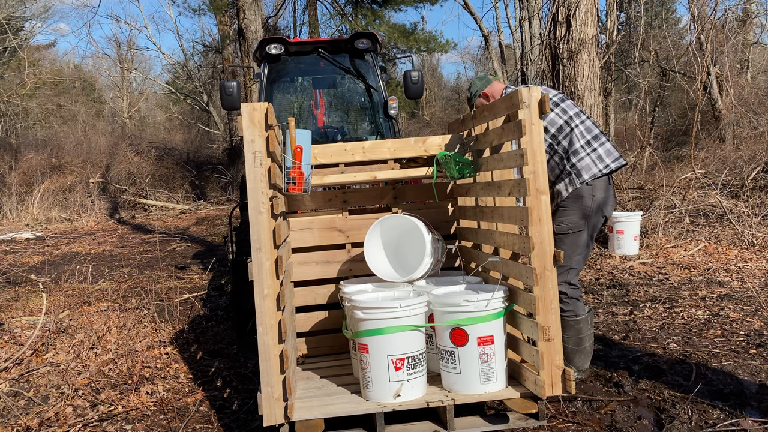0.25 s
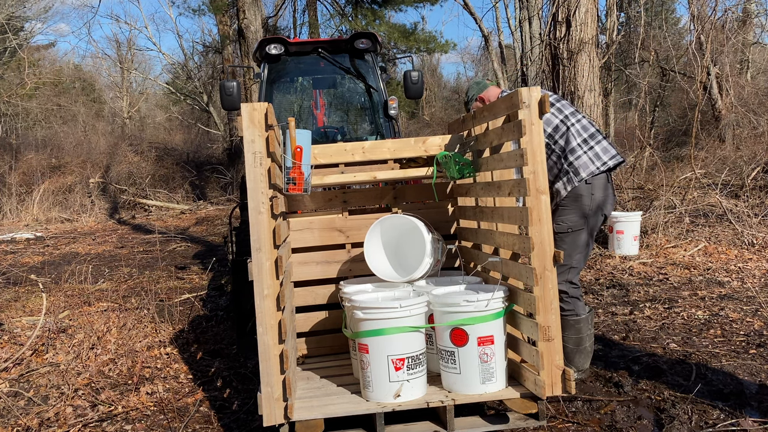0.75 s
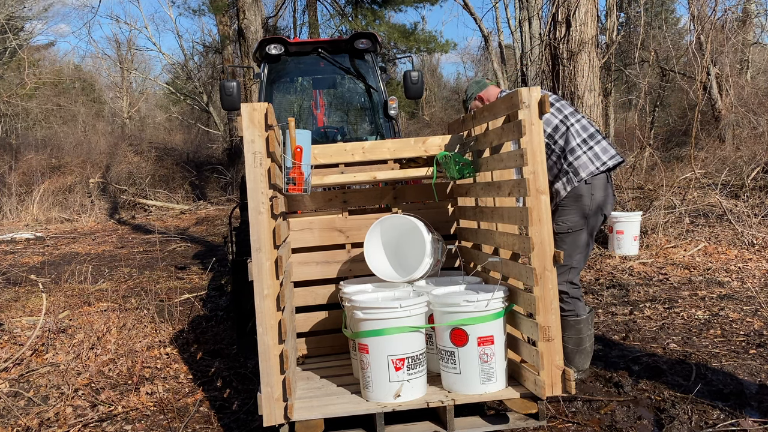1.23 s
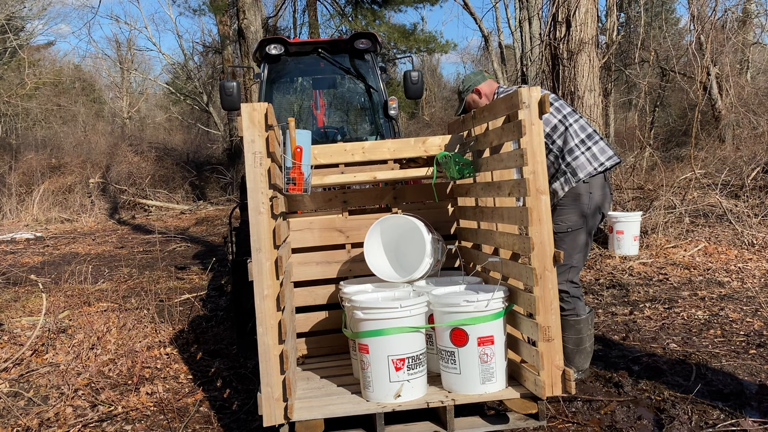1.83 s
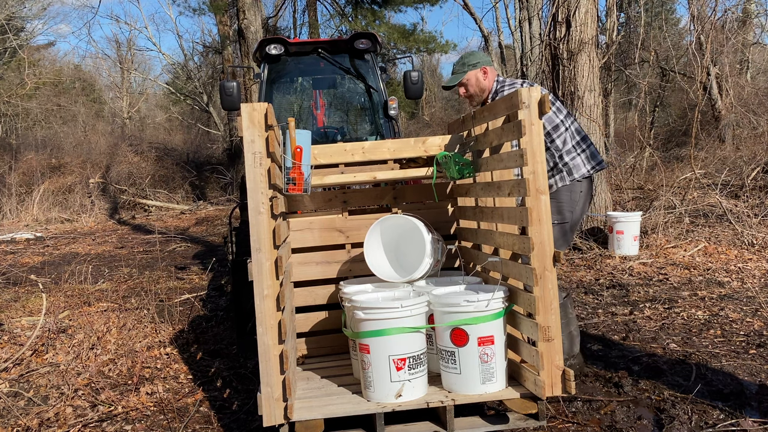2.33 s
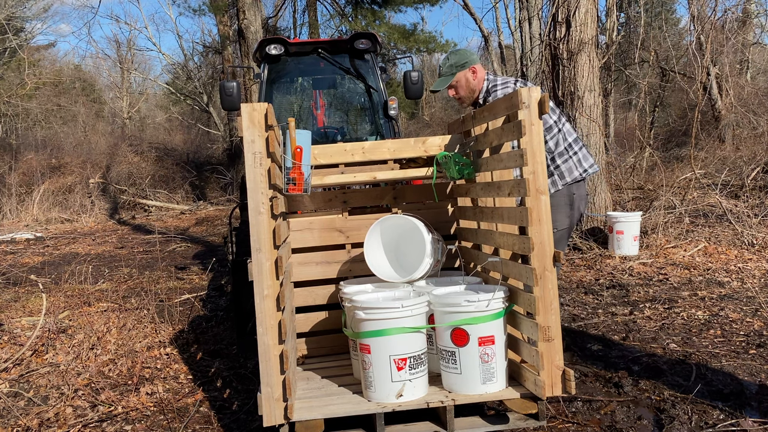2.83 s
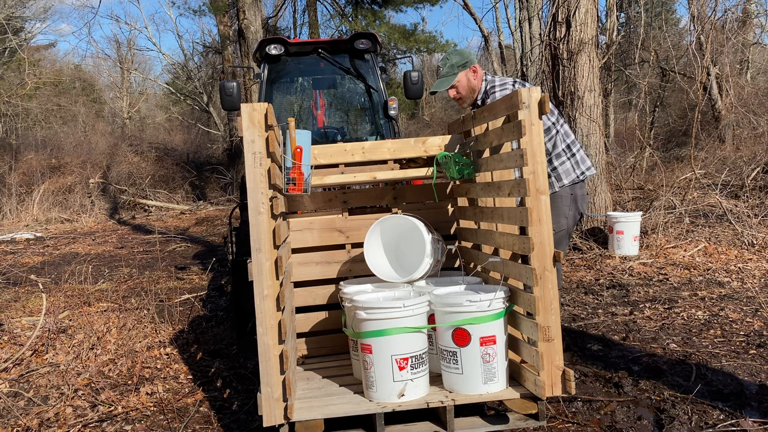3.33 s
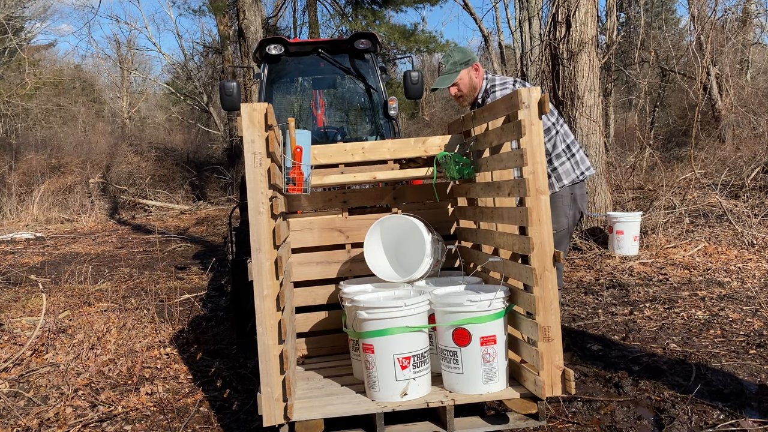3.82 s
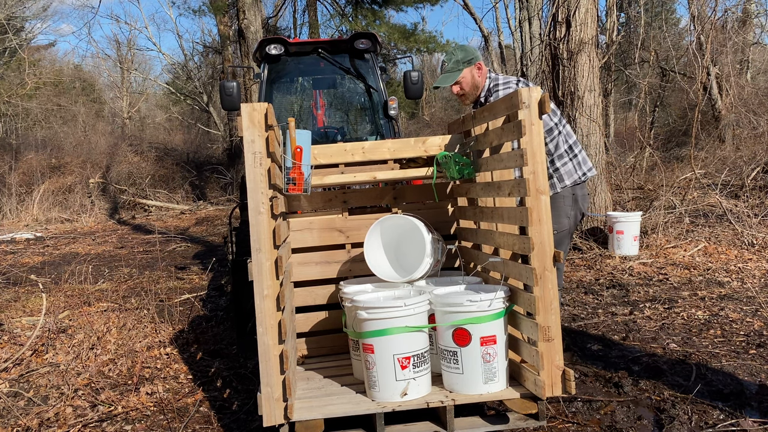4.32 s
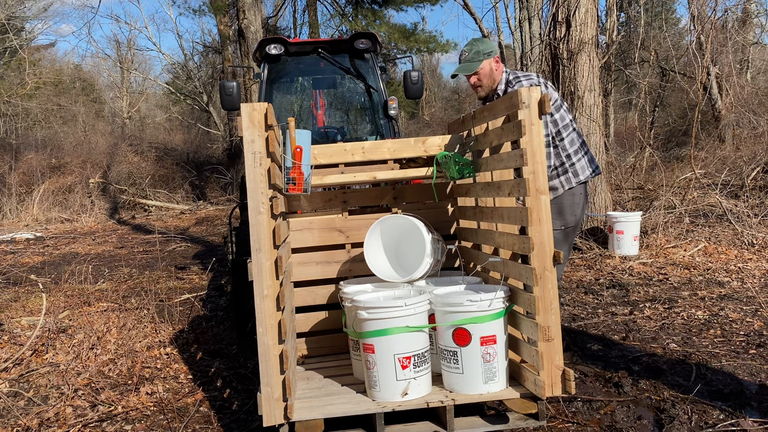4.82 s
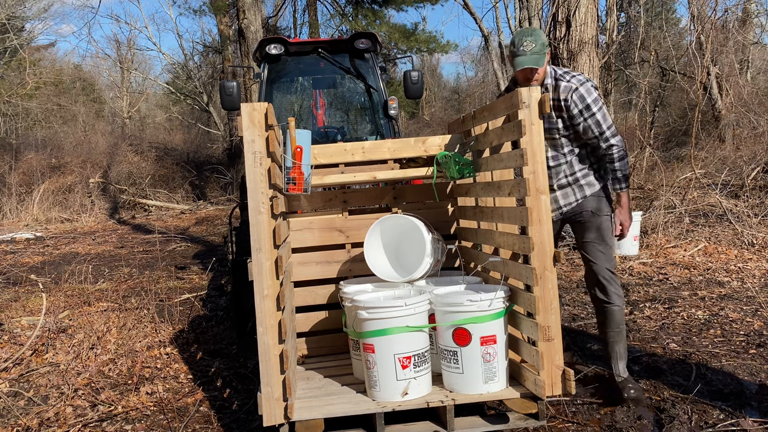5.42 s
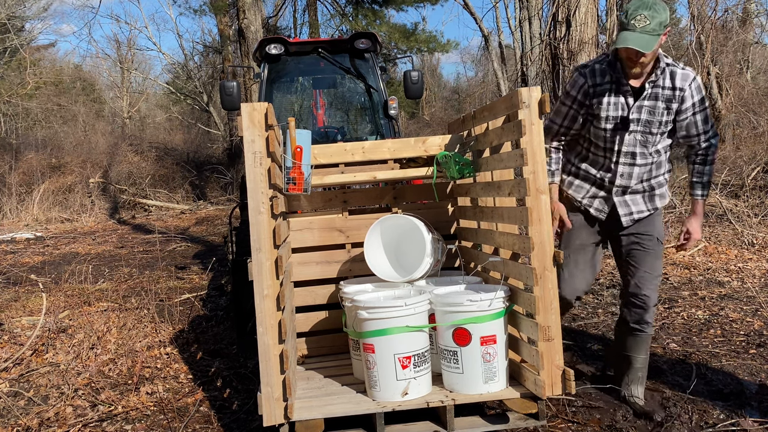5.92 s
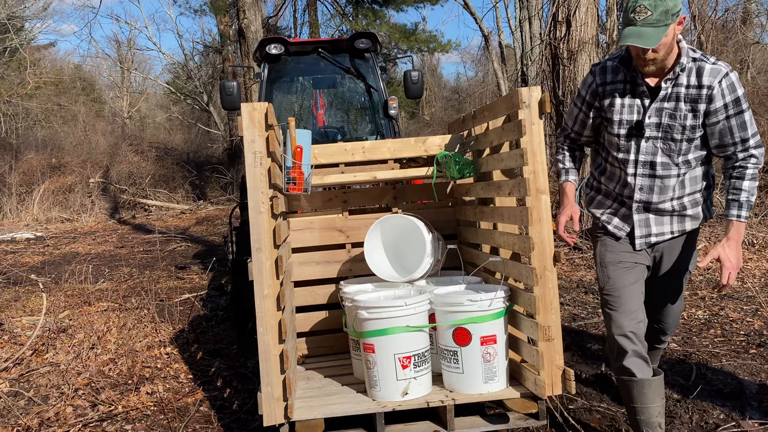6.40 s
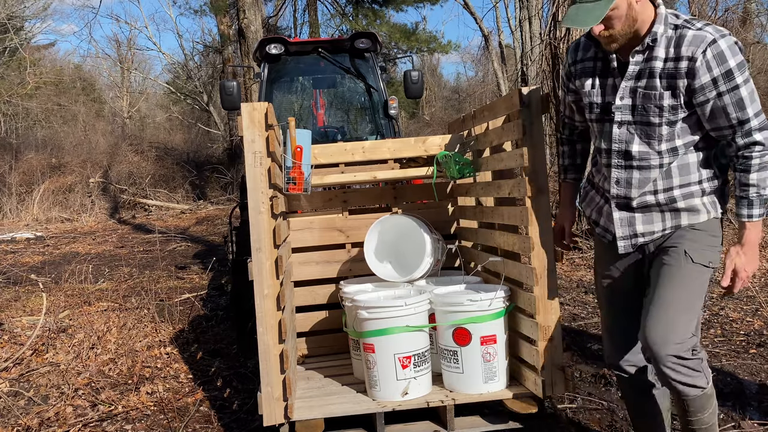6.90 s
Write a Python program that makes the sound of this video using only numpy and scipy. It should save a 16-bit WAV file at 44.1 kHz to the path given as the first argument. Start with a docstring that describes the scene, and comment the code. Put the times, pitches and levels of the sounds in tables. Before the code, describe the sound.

A steel ratchet tightens a strap behind a wooden pallet crate with sharp clicks, rattles and slat knocks, then boots crunch through dry leaves.

```python
"""In a quiet wood, over far rumble and hiss (filtered noise), a steel ratchet tightens a strap behind a wooden crate.
Pawls snap over the teeth (noise cracks with ringing steel modes) and the loaded handle rattles (grainy noise).
Meanwhile the strained slats knock (wood modes), the strap scuffs (noise swells) and its hook touches steel (short
notes); a thin far tone fades early. Then boots crunch through leaf litter (grains of soil, twig and leaf noise).
A mono microphone feeds the right input only; the left stays silent."""
import sys
import numpy as np
from scipy import signal
from scipy.fft import rfft, irfft, next_fast_len
from scipy.io import wavfile
from scipy.ndimage import uniform_filter1d, map_coordinates

SR = 44100
rng = np.random.default_rng(int(sys.argv[2]) if len(sys.argv) > 2 else 0)


def bounce(signal):
    """Save signal as a 16-bit WAV file at the path given by the first command-line argument."""
    frames = np.transpose(np.atleast_2d(signal))
    limited = np.clip(frames, -1, 1)
    pcm = np.round(limited * 32767).astype(np.int16)
    wavfile.write(sys.argv[1], SR, pcm)


N = 315315  # samples
# All levels in the tables are relative: scene() doubles the whole mix.


def amp(db):
    """Turns dB into gain."""
    return 10 ** (np.asarray(db) / 20)


def unit(x):
    """Scales to rms 1."""
    return x / np.sqrt(np.mean(x ** 2, axis=-1, keepdims=True) + 1e-20)


def along(points, hz):
    """Reads a curve of (Hz, value) points on a log frequency axis."""
    f, value = np.transpose(points)
    return np.interp(np.log(hz + 1), np.log(f + 1), value)


def level_curve(points):
    """Draws (s, dB) points as one dB value per sample, -140 dB outside the table."""
    s, db = np.transpose(points)
    return np.interp(np.arange(N) / SR, s, db, left=-140, right=-140)


def wobble(rate):
    """Draws a smooth random curve with rate knots a second."""
    knots = rng.standard_normal(int(N * rate / SR) + 4)
    return map_coordinates(knots, [np.arange(N) * rate / SR])


def filtered(x, response):
    """Multiplies the spectrum of x by a response of frequency."""
    m = next_fast_len(x.shape[-1] + 4096)  # zero padding
    spectrum = rfft(x, m) * response(np.fft.rfftfreq(m, 1 / SR))
    return irfft(spectrum, m)[..., :x.shape[-1]]


def noise(spectrum, shape=N):
    """Colours white noise by (Hz, dB) points, at rms 1."""
    return unit(filtered(rng.standard_normal(shape), lambda hz: amp(along(spectrum, hz))))


def placed(times, sounds):
    """Starts each row of sounds at its time in seconds and mixes them."""
    at = np.round(times * SR).astype(int)[:, None] + np.arange(sounds.shape[1])
    return np.bincount(at.ravel(), sounds.ravel(), N + SR)[:N]


def ring(modes, gains_db, t, scatter_db, detune):
    """Strikes decaying sine modes once per row, each time at new strengths and slightly new pitch."""
    hz, db, t60 = np.transpose(modes)
    luck = rng.standard_normal((len(gains_db), 2, len(hz)))
    level = amp(db + gains_db + scatter_db * luck[:, 0])
    pitch = hz * (1 + detune * luck[:, 1])
    total = 0
    for k in range(len(hz)):
        decay = amp(-60 * t / t60[k])
        total = total + level[:, [k]] * decay * np.sin(2 * np.pi * pitch[:, [k]] * t)
    return total


def grainy(spectrum, rate, spread_db, life, smooth):
    """Mixes short noise bursts (rate per second, life in s) of random size with smooth noise, at rms 1."""
    seeds = (rng.random(N) < rate / SR) * amp(spread_db * rng.exponential(size=N))
    grains = signal.lfilter([1], [1, -np.exp(-1 / (life * SR))], seeds)
    raw = (unit(grains) + smooth) * rng.standard_normal(N)
    return unit(filtered(raw, lambda hz: amp(along(spectrum, hz))))


def bursts(rows, grit_db, sharpness, ripple_db):
    """Shapes gritty noise swells, each around its own broad pitch with chance resonances of its own."""
    s, length, db, pitch = (c[:, None] for c in np.transpose(rows))
    t = np.arange(SR // 6) / SR
    u = t / length
    swell = np.sqrt(u) * np.exp(-1.5 * u ** 2)
    luck = rng.standard_normal((len(s), 3, len(t)))
    grit = amp(grit_db * unit(uniform_filter1d(luck[:, 0], size=90)))  # grains of a millisecond or two

    def colour(hz):
        ripple = amp(ripple_db * unit(uniform_filter1d(luck[:, 2, :len(hz)], size=60)))
        peak = 1 / (1 + (sharpness * (hz / pitch - pitch / (hz + 1))) ** 2) ** 0.61
        return ripple * peak / (1 + (hz / 11000) ** 4)

    return placed(s[:, 0], amp(db) * swell * unit(filtered(grit * luck[:, 1], colour)))


# Spectrum of the far rumble and hiss. Each row: frequency in Hz, relative level in dB.
AIR_SPECTRUM = [(15, -41), (25, -15), (80, 6), (270, 6.5), (887, -5.5), (1650, -8.5), (1890, -14.5),
                (2990, -17.5), (5280, -24), (7920, -28), (10100, -30.5), (14400, -39), (16000, -55.5)]
# Path of a faint far tone. Each row: time in seconds, level in dB.
TONE_LEVEL = [(0, -92), (1, -88), (2.4, -88), (2.9, -100)]
AIR_DB, TONE_HZ = -65, 682


def woodland():
    """Far rumble and hiss, as coloured noise, hold nearly steady; a thin sine tone wavers in them."""
    waver = 0.7 * wobble(5)  # radians
    tone_gain = amp(level_curve(TONE_LEVEL) + 3 * wobble(6))
    tone = tone_gain * np.sin(2 * np.pi * TONE_HZ * np.arange(N) / SR + waver)
    swell_db = 0.6 * wobble(1.5) + wobble(10)
    return amp(AIR_DB + swell_db) * noise(AIR_SPECTRUM) + tone


# A boot presses on the ground. Each row: start in seconds, then soil, twig and leaf level in dB.
BOOT_PRESSES = [(5.51, -58, -54, -59.5), (5.7, -77, -65, -69), (5.92, -60, -69, -73.5),
                (6.068, -41.5, -54.5, -67), (6.25, -60, -60.5, -60), (6.399, -57, -54.5, -63.5),
                (6.65, -71, -67.5, -77.5), (7.041, -61.5, -63.5, -61)]
# Spectrum of soil giving way. Each row: frequency in Hz, relative level in dB.
SOIL_SPECTRUM = [(110, -52), (195, -2.5), (250, -12), (345, -1), (480, -5.5), (650, -12.5), (890, -2.5),
                 (1150, -11), (1700, -29), (2500, -72)]
# Spectrum of crackling leaves. Each row: frequency in Hz, relative level in dB.
LEAF_SPECTRUM = [(1470, -43), (2500, -28), (3380, 1.5), (5030, -3), (5870, -5.5), (9730, -10.5),
                 (16000, -28)]
# Twigs and leaves giving way under a boot. Each row: start and length in seconds, level in dB, pitch in Hz.
CRUNCHES = [(5.536, 0.0068, -32.5, 5470), (5.585, 0.017, -33.5, 3030), (5.604, 0.022, -35.5, 1460),
            (5.61, 0.017, -40.5, 5300), (5.69, 0.026, -46, 1730), (5.785, 0.022, -40, 1420),
            (5.826, 0.0069, -50.5, 2210), (5.957, 0.0063, -42.5, 690), (6.078, 0.029, -38.5, 447),
            (6.092, 0.026, -37, 800), (6.11, 0.043, -45.5, 2256), (6.155, .035, -42.5, 816),
            (6.21, 0.038, -44, 930), (6.328, 0.017, -39, 1230), (6.33, 0.0063, -51, 3980),
            (6.396, 0.016, -28.5, 1550), (6.408, 0.02, -33.5, 3530), (6.456, .01, -37, 3380),
            (6.468, 0.017, -42.5, 2430), (6.64, 0.022, -49.5, 4400), (6.71, 0.031, -55.5, 3130),
            (6.752, 0.018, -50.5, 3280), (6.835, 0.016, -54, 1050), (7.01, 0.025, -56.5, 3800),
            (7.078, 0.05, -47, 2930)]
LOAD_S = 0.055  # rise time of a press
SOIL_SETTLE, TWIG_SETTLE, LEAF_SETTLE = 59.5, 79, 60.5  # fading, dB per second


def boots():
    """Soil gives in lumps, twigs and leaves crackle in grains under louder crunches; presses swell and settle."""
    settle = np.c_[[SOIL_SETTLE, TWIG_SETTLE, LEAF_SETTLE]]
    weight = np.zeros((3, N))
    for start, *db in BOOT_PRESSES:
        since = np.maximum(np.arange(N) / SR - start, 0)
        weight += np.minimum(since / LOAD_S, 1) * amp(np.c_[db] - settle * since)
    twig_spectrum = [(800, -38), (1300, 11.5), (2700, 9), (4000, -24.0)]  # (Hz, relative dB)
    soil = weight[0] * grainy(SOIL_SPECTRUM, rate=130, spread_db=3.0, life=0.0088, smooth=0.21)
    twig = weight[1] * grainy(twig_spectrum, rate=410, spread_db=1, life=0.015, smooth=0.4)
    leaf = weight[2] * grainy(LEAF_SPECTRUM, rate=510, spread_db=1.5, life=0.0043, smooth=0.85)
    crunches = bursts(CRUNCHES, grit_db=5, sharpness=1.05, ripple_db=3)
    return soil + twig + leaf + crunches


# Knocks of slats and pallet. Each row: start in seconds, level, brightness and boom in dB.
KNOCKS = [(0.787, -54.5, 3.5, 0.5), (0.824, -57.5, 13.5, 4.5), (1.129, -53, 5.5, -10),
          (1.432, -52, 13.5, -3), (1.477, -45, 6.5, -14), (1.503, -36.5, -6, -9), (1.73, -55.5, -11, -10),
          (1.791, -48, 3.5, -10), (2.23, -42.5, 1, -12), (2.281, -51, -10, -4), (2.521, -58, 16, -7),
          (2.865, -46.5, 3, -6), (2.941, -48.5, 7.5, -4), (3.204, -56.5, 19, 5), (3.271, -54, 14, 8),
          (3.471, -51, 5.5, -3.5), (3.64, -47, 8, -5), (4.1, -51.5, -12, 4.5), (4.466, -63, 15, -11),
          (4.478, -58.5, 25, -19.5), (4.491, -56.5, 22.5, -13), (4.69, -48, 2, -11.5),
          (4.966, -48.5, 17.5, -28), (5.064, -52.5, 11, 0), (5.138, -47, 15.5, 3.5)]
# Modes of the wood. Each row: frequency in Hz, relative level in dB, 60 dB decay time in seconds.
WOOD_MODES = [(170, -14.5, 0.16), (288.4, -2.5, 0.27), (329.4, -8.5, 0.26), (413, -7, 0.1),
              (483, -11.5, 0.056), (617, -5.5, 0.054), (977, -15, 0.041), (1200, 0.5, 0.0095),
              (1600, -7, 0.036), (1800, -23, 0.008)]
# Strap and handle rubbing on slats. Each row: start and length in seconds, level in dB, pitch in Hz.
SCUFFS = [(.66, 0.053, -49, 5030), (.77, 0.082, -51, 326), (.897, 0.032, -56.5, 1180),
          (1.43, 0.058, -43, 4450), (1.505, 0.05, -45.5, 205), (1.508, 0.012, -39.5, 700),
          (2.23, 0.018, -47, 1480), (2.235, 0.032, -44.5, 343), (2.555, 0.041, -49, 480),
          (2.278, 0.013, -44.5, 2000), (2.295, 0.045, -46.5, 1170), (2.325, 0.025, -43, 1550),
          (2.55, 0.051, -41.5, 1700), (2.575, 0.031, -44, 3400), (2.75, 0.049, -47.5, 5000),
          (2.828, 0.02, -50, 1400), (2.858, 0.029, -43, 1000), (2.92, 0.035, -41, 4860),
          (3.6, 0.078, -62.5, 1560), (4.33, 0.032, -52, 4070), (4.485, 0.029, -51, 860),
          (4.66, .06, -49, 2150), (4.97, 0.03, -41.5, 1180)]


def crate():
    """Strap tension knocks the slats; some knocks reach the higher modes, some set the crate's hollow booming."""
    s, db, bright_db, boom_db = np.transpose(KNOCKS)
    t = np.arange(SR // 5) / SR
    hz = np.transpose(WOOD_MODES)[0]
    high = hz > 800
    hollow = np.abs(hz - 295) < 45
    gains_db = db[:, None] + high * bright_db[:, None] + hollow * boom_db[:, None]
    onset = 1 - np.exp(-t / 0.0008)
    knocks = onset * ring(WOOD_MODES, gains_db, t, scatter_db=3, detune=0.015)
    return placed(s, knocks) + bursts(SCUFFS, grit_db=3.5, sharpness=0.94, ripple_db=2.0)


# The strap hook touches steel. Each row: start in seconds, level in dB, pitch in Hz.
HOOK_TOUCHES = [(0.625, -50.5, 1550), (1.289, -41.5, 3630), (2.884, -34, 4020), (4.034, -43.5, 4130)]


def hook():
    """Each touch is one short decaying sine; its phase wanders, so it sounds scratchy."""
    s, db, hz = (c[:, None] for c in np.transpose(HOOK_TOUCHES))
    t = np.arange(SR // 10) / SR
    wander = 0.12 * np.cumsum(rng.standard_normal((len(s), len(t))), axis=1)
    envelope = amp(db - 60 * t / 0.029) * (1 - np.exp(-t / 0.00094))
    return placed(s[:, 0], envelope * np.sin(2 * np.pi * hz * t + wander))


# A fine rustle behind everything. Each row: time in seconds, level in dB.
RUSTLE_LEVEL = [(0.0, -79), (0.67, -75), (0.82, -72), (2.05, -76), (2.19, -64), (3.27, -78.5), (3.86, -77),
                (4.22, -88), (4.68, -74.5), (5.44, -69.5), (5.63, -68.5), (6.05, -70.5), (6.33, -68),
                (6.59, -70), (6.83, -79.5), (7.15, -71.5)]
# Spectrum of that rustle. Each row: frequency in Hz, relative level in dB.
RUSTLE_SPECTRUM = [(700, -29.5), (1500, -6.5), (3000, -4), (6000, -3.5), (10000, -11.5), (16000, -30.5)]
# Spells in which the loaded handle chatters. Each row: start and length in seconds, level in dB.
CHATTER = [(0.642, 0.082, -45), (0.767, 0.077, -47), (0.953, 0.16, -52), (1.388, 0.064, -51),
           (1.996, 0.082, -44.5), (2.084, 0.12, -42), (2.223, 0.097, -50), (2.531, 0.077, -40),
           (2.736, .07, -47.5), (2.85, .1, -42), (3.576, 0.12, -40.5), (3.945, 0.055, -46.5),
           (4.316, .04, -60), (4.419, .04, -63), (4.63, 0.071, -42)]
PLAY_UNDER_DB = 18.5  # loose play of spring and strap, under a spell's level


def loose_play():
    """A fine grainy rattle swells through each spell of chatter, over a faint rustle that comes and goes."""
    t = np.arange(N) / SR
    spells = np.zeros(N)
    for start, length, db in CHATTER:
        from_middle = t - start - length / 2
        spells += amp(db - PLAY_UNDER_DB) * np.exp(-(from_middle / (0.4 * length)) ** 2)
    rustle = grainy(RUSTLE_SPECTRUM, rate=340, spread_db=2.5, life=0.0035, smooth=1.7)
    rattle = grainy(CRACK_SPECTRUM, rate=370, spread_db=4.0, life=0.0033, smooth=0.34)
    return amp(level_curve(RUSTLE_LEVEL)) * rustle + spells * rattle


TOUCH_SPREAD_DB, TOUCH_LOW_DB, TOUCH_LOW_SPREAD_DB = 3.5, -1.5, 6


def chatter_touches(count):
    """Spreads small contacts by chance through each chatter spell: times, level dB, low part dB."""
    start, length, db = (c[:, None] for c in np.transpose(CHATTER))
    luck = rng.standard_normal((len(start), 3, count))
    s = start + length * (np.arange(count) + 0.5 + np.tanh(luck[:, 0]) / 2) / count
    level_db = db + TOUCH_SPREAD_DB * luck[:, 1]
    low_db = TOUCH_LOW_DB + TOUCH_LOW_SPREAD_DB * luck[:, 2]
    return np.array([s, level_db, low_db]).reshape(3, -1)


# The handle hits its stop. Each row: start in seconds, level in dB.
SLAPS = [(0.728, -67), (0.795, -62), (1.479, -51), (2.13, -74.5), (2.936, -75)]
# Long-ringing handle modes. Each row: frequency in Hz, relative level in dB, 60 dB decay time in seconds.
HANDLE_MODES = [(6270, -7, 0.083), (9800, -15, 0.26)]


def handle_slaps():
    """The handle's long steel modes ring each time it hits its stop."""
    s, db = np.transpose(SLAPS)
    t = np.arange(SR // 4) / SR
    return placed(s, ring(HANDLE_MODES, db[:, None], t, scatter_db=7.0, detune=0.001))


# Clear pawl snaps and handle contacts. Each row: contact time in seconds, peak level in dB, low part in dB.
CLICKS = [(0.3373, -15.5, -8), (0.4129, -14, 1), (0.5964, -50, -8), (.6529, -41, 0), (0.6697, -39, -7),
          (0.6873, -28, -26), (0.7056, -28.5, -12), (.724, -30, -19), (0.7306, -14.5, -21),
          (0.737, -24.5, -7), (0.7452, -30, -4), (.776, -27, -7), (0.7868, -25.5, -20),
          (0.7939, -16, -12.5), (0.8406, -42.5, -24), (0.9098, -42, -17), (.9292, -47.5, -12),
          (0.9574, -33, -6.5), (1.072, -11.5, -11.5), (1.1213, -36, 1.5), (1.1316, -14.5, -12.5),
          (1.2722, -36.5, -3.5), (1.336, -34, -5), (1.346, -34.5, -13), (1.3613, -38, 0),
          (1.4243, -32, -16), (1.4304, -14, -22), (1.441, -28.5, 4), (1.471, -23.5, -14),
          (1.4787, -15.5, -19.5), (1.5038, -32.5, 9), (1.6431, -31, -17.5), (1.6683, -35, -4),
          (1.7332, -15, -5.5), (1.753, -38.5, 0), (1.7948, -18, -6.5), (2.041, -36.5, 4.5),
          (2.0488, -27, -10), (2.067, -37, -5.5), (2.096, -32, -22), (2.1025, -25.5, -23),
          (2.1148, -22.5, -16), (2.1208, -25, -10.5), (2.1284, -28, 3), (2.1307, -19, -18),
          (2.165, -32, -10), (2.1903, -20, 3.5), (2.1961, -16.5, -15), (2.212, -38, 21), (2.2342, -30, 8),
          (2.3279, -27.5, -4), (2.417, -40.5, 18.5), (2.4786, -16.5, -8.5), (2.5253, -16.5, -3),
          (2.5852, -49.5, 0), (2.7678, -36.5, -4), (2.792, -48, -10), (2.799, -29, -15.5),
          (2.8301, -42.5, 1.5), (2.8506, -33, -18.5), (2.8606, -27, -15.5), (2.8659, -21, -10),
          (2.889, -37.5, -18), (2.928, -38, -30), (2.9368, -22.5, -16), (2.9418, -28, -14),
          (3.0784, -37, -15), (3.0963, -35.5, -5.5), (3.1154, -42, 9), (3.124, -36.5, 4), (3.202, -18, -3),
          (3.2678, -16.5, -1.5), (3.4709, -32, 3.5), (3.48, -31.5, 9), (3.5733, -38, -18),
          (3.592, -43.5, -14), (3.6114, -31, -22), (3.629, -26, 4.5), (3.6333, -22, -18),
          (3.6772, -43, -10), (3.7138, -36.5, -7), (3.7816, -43, -8), (3.963, -29, 1), (4.0307, -50.5, -6),
          (4.0969, -18, -1.5), (4.3461, -39, 10), (4.3531, -36.5, 5.5), (4.629, -33.5, -22),
          (4.656, -34, -14), (4.665, -27.5, -6), (4.6716, -22.5, -7), (4.68, -33.5, -15),
          (4.8121, -48.5, 14), (4.923, -35.5, 3), (4.9673, -32, 12.5), (5.064, -20, -6), (5.1251, -38, 21),
          (5.1386, -17.5, -10.5)]
# Spectrum of the crack, also used by the rattle. Each row: frequency in Hz, relative level in dB.
CRACK_SPECTRUM = [(410, -58), (700, -14), (1360, -16.5), (1620, -7), (2020, -8.5), (2370, -7), (4150, -2),
                  (6570, 0.5), (8880, -4.5), (16000, -23)]
# Modes of the ratchet frame. Each row: frequency in Hz, relative level in dB, undamped 60 dB decay in seconds.
STEEL_MODES = [(2458, -15.5, 0.3), (3208, -1.5, 0.079), (4080, -13.5, 0.17), (4820, -9, 0.11),
               (5860, -8, 0.054), (6300, -8, 0.0053), (6900, -16, 0.015), (8000, 12, 0.0085),
               (8805, 10.5, 0.015), (9560, -5, 0.0159), (11050, 2.5, 0.042), (13120, -1, 0.026)]


def ratchet():
    """Each contact: the pawl slides off the tooth, cracks down, briefly rings the frame and scatters off the slats."""
    s, db, low_db = np.concatenate([np.transpose(CLICKS), chatter_touches(count=5)], axis=1)
    db, low_db = db[:, None], low_db[:, None]
    lead = 0.006  # seconds of slide before contact
    t = np.arange(SR // 10) / SR - lead
    after = np.maximum(t, 0)
    rise = 1 - np.exp(-after / 0.00013)

    slide = amp(-15.0 + 60 * np.minimum(t, 0) / 0.017) * (t < 0.0005)
    snap_t60 = 0.0088 * amp(0.063 * (db + 20.5))  # lighter touches crack more briefly
    snap = amp(-60 * after / snap_t60)
    scatter = amp(-13.0 - 60 * after / 0.058)
    crack = noise(CRACK_SPECTRUM, (len(s), len(t))) * (slide + rise * (snap + scatter))

    damped = amp(-14 - 60 * after / 0.045)
    frame = ring(STEEL_MODES, np.zeros((len(s), 1)), after, scatter_db=2.5, detune=0.044)
    steel = damped * rise * frame

    top_db = 3 * rng.standard_normal((len(s), 1))  # brightness varies at random from contact to contact

    def tone_balance(hz):
        low = 1 / (1 + (hz / 3200) ** 6)
        top = 1 / (1 + (9000 / (hz + 1)) ** 8)
        return amp(low_db * low + top_db * top)

    hits = filtered(crack + steel, tone_balance)
    hits = hits / np.abs(hits).max(axis=1, keepdims=True)
    return placed(s - lead, amp(db) * hits)


def scene():
    """Mixes all sources at one microphone, wired to the right input."""
    mono = woodland() + boots() + crate() + hook() + loose_play() + handle_slaps() + ratchet()
    return 2 * mono * np.array([[0], [1]])  # left, right


TOP_HZ = 16300  # band limit


def record(dry):
    """Keeps nothing above the band limit."""
    return filtered(dry, lambda hz: hz < TOP_HZ)


dry = scene()
out = record(dry)
bounce(out)
```